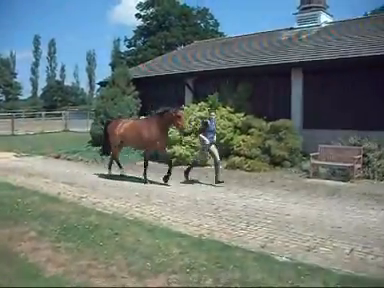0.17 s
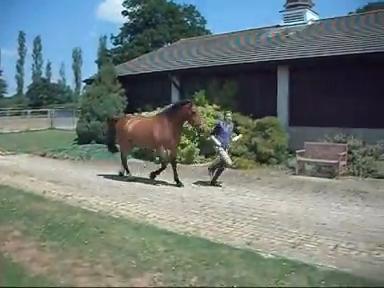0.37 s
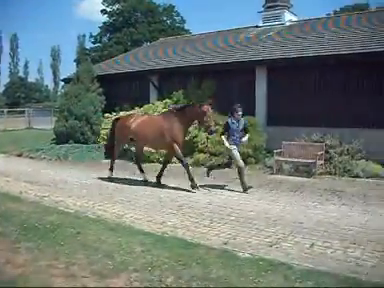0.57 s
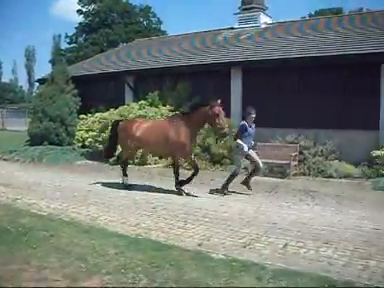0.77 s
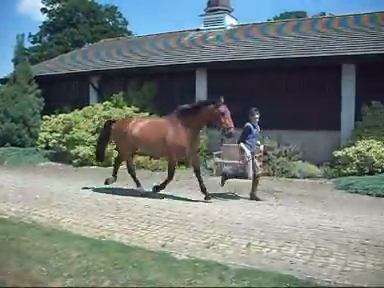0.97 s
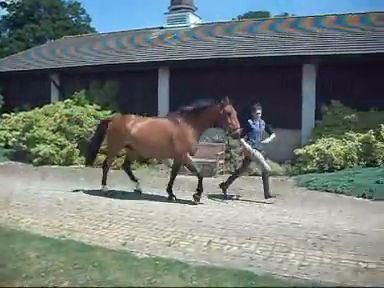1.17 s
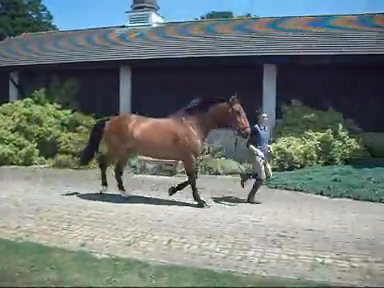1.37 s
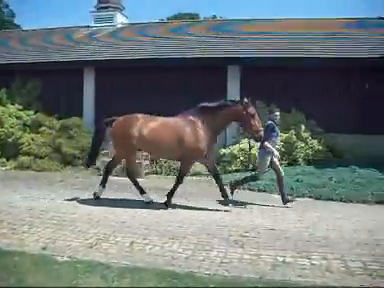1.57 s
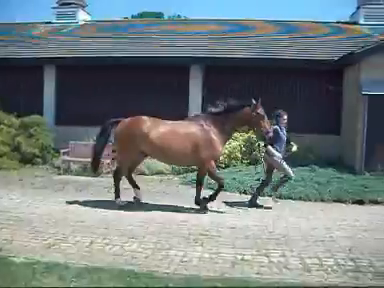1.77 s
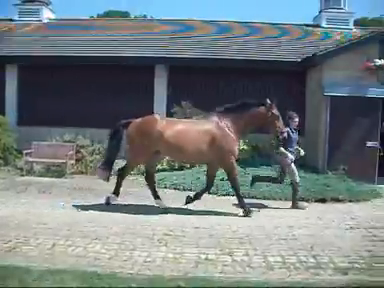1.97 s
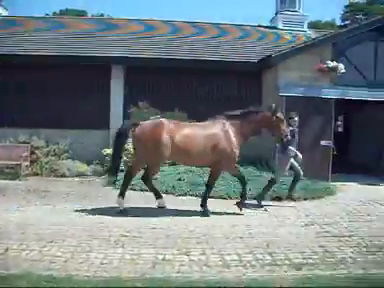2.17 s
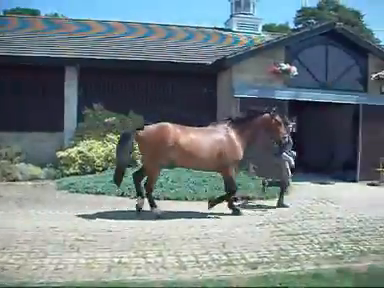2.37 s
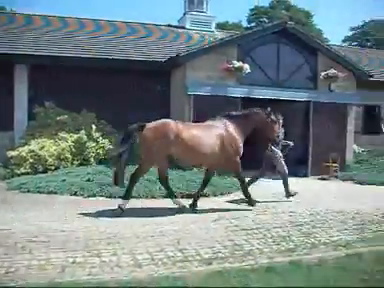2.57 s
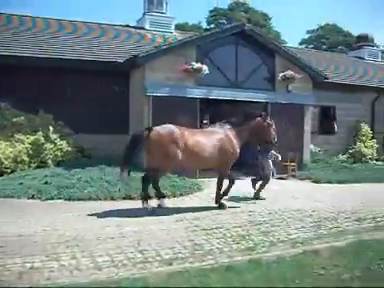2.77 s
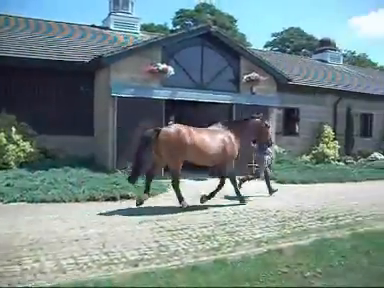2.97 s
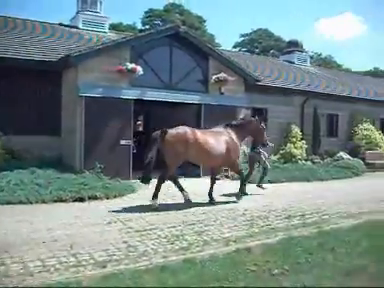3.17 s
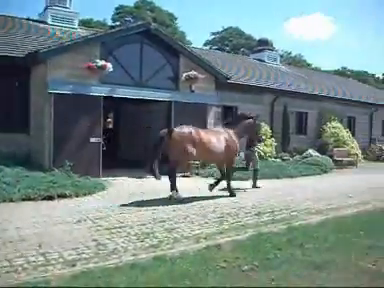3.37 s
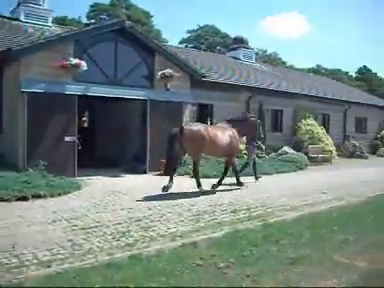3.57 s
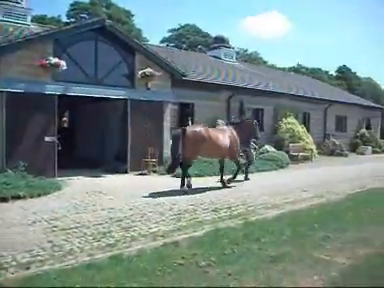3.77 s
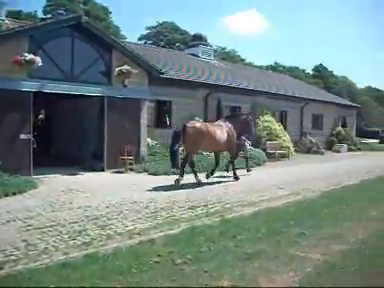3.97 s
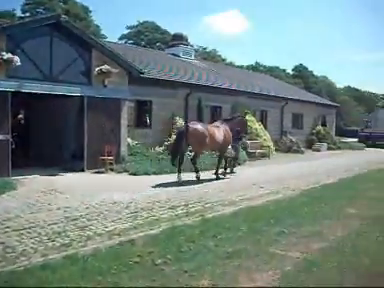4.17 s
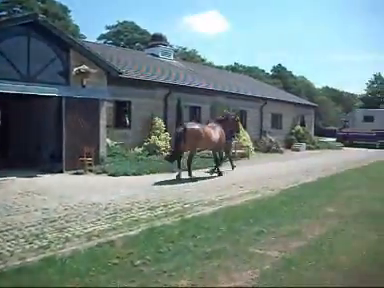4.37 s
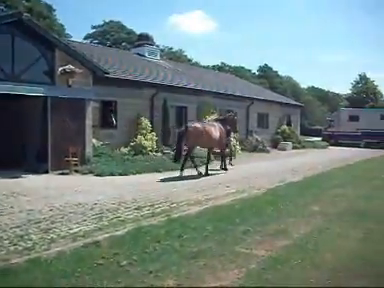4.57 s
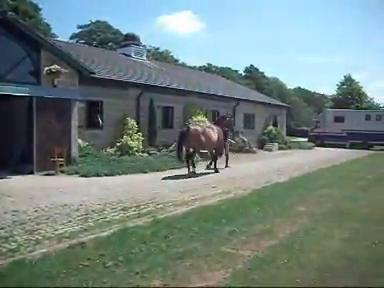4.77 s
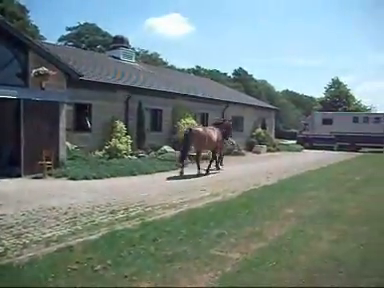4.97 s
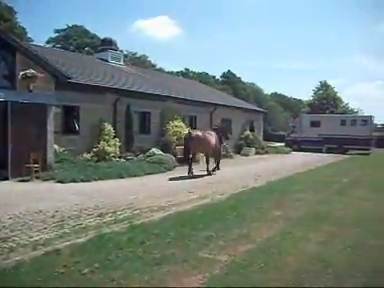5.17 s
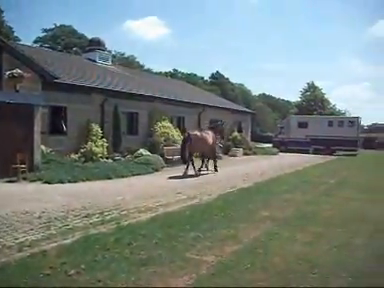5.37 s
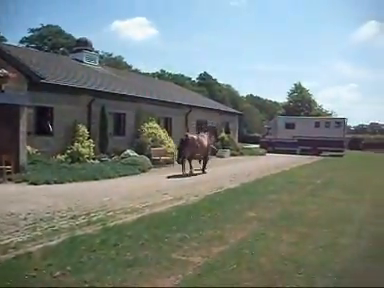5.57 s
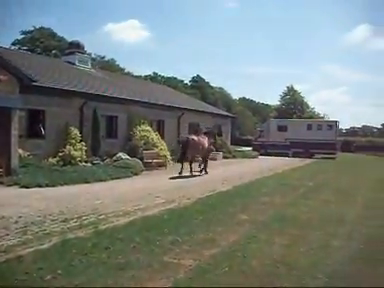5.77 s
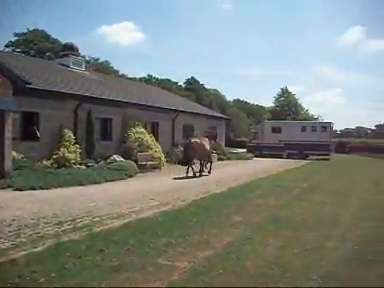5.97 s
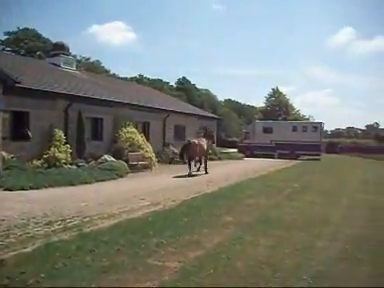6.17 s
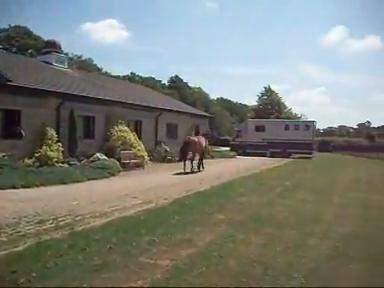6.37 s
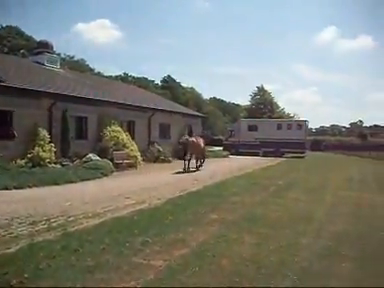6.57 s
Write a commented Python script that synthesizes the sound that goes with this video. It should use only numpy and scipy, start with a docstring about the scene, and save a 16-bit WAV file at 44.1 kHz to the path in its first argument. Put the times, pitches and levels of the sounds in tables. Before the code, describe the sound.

Even two-beat hoofbeats ring on a gritty stable yard, swelling near the middle and fading away, with early wind buffets and faint bird chips.

```python
"""A gust already rumbles on the microphone over a hush of far trees: both are noise shaped by spectra.
A shod horse trots in on stable-yard paving: hollow horn and clicking steel are decaying modes, grit is grains.
Noise reverb and a delayed slap answer from the wall; scuffs, skids and a bird's gliding whistles slip in.
Wind buffets crowd in from one to two seconds, as the handler's boots join with dull knocks.
The horse passes close near the middle, then its steps fade as it moves away."""
import sys
import numpy as np
from scipy import signal
from scipy.fft import rfft, irfft
from scipy.io import wavfile
from scipy.ndimage import uniform_filter1d

SR = 44100
rng = np.random.default_rng(int(sys.argv[2]) if len(sys.argv) > 2 else 0)


def output_pcm(signal):
    """Save a mono or channel-first signal as 16-bit PCM at the path in sys.argv[1].

    Samples are clipped to [-1, 1] before scaling.
    """
    pcm = np.clip(np.atleast_2d(signal).T, -1, 1) * 32767
    wavfile.write(sys.argv[1], SR, np.round(pcm).astype(np.int16))


N = 291060
TIME = np.arange(N) / SR
AGE = TIME[:SR // 12]   # time since a contact [s]
ATTACK = AGE < .004   # the first 4 ms of a blow

# outdoor hush: (frequency [Hz], relative level [dB])
HUSH_SPECTRUM = [(20, -13), (35, 6.5), (50, -6.5), (140, -6.5), (310, -7), (420, -12.5), (620, -10),
                 (1400, -19), (3700, -22.5), (5500, -27), (7300, -38.5), (9000, -56)]
# low wind rumble: (frequency [Hz], relative level [dB])
RUMBLE_SPECTRUM = [(20, -0.5), (36, -3), (65, -6), (100, -10), (200, -25.5), (400, -76.5)]
# wind flutter: (frequency [Hz], relative level [dB])
FLUTTER_SPECTRUM = [(40, -69), (100, 9.5), (190, 3), (320, -4), (500, -15.5), (1000, -43), (3000, -78)]
# gusts, added to the breeze: (peak time [s], swell to 1/e [s], rumble [dB], flutter [dB])
GUSTS = [(.02, 0.23, -37, -36), (.52, 0.24, -37.5, -37), (1.11, 0.069, -27.5, -33), (1.5, 0.19, -27.5, -23),
         (2.188, 0.15, -23.5, -31), (2.72, 0.17, -38.5, -41)]
BREEZE_RUMBLE_DB, BREEZE_FLUTTER_DB = -40, -66   # steady wind under the gusts
# single eddies thumping the microphone: (time [s], peak level [dB], pulse frequency [Hz])
BUFFETS = [(.038, -18, 70.4), (0.656, -19.5, 55.4), (1.084, -21, 60.5), (1.185, -8, 212), (1.268, -13, 109),
           (1.339, -3.5, 113), (1.474, -3, 240), (1.563, -12, 185), (1.638, -12, 149), (2.045, -9.5, 70),
           (2.215, -13.5, 130)]
# hoof landings before the horn and steel trims, two to a beat: (first touch [s], roll until flat [s],
# touch level [dB], flat slap level [dB], clop pitch control [Hz], steel over horn [dB],
# edge click pitch control [Hz])
LANDINGS = [(0.09, 0.012, -18, -14.5, 940, -8.5, 2580), (0.1379, 0.0034, -18, -26, 1060, 4, 2840),
            (0.4353, 0.011, -19, -17, 950, -8, 3800), (0.4771, 0.0046, -23, -10.5, 870, -2.5, 3760),
            (0.758, 0.015, -17, -15.5, 935, -3, 2970), (0.7999, .0033, -20.5, -15, 900, 2.5, 3500),
            (1.0891, 0.018, -22.5, -14, 790, 0, 3450), (1.1307, 0.0052, -13, -8, 840, -4.5, 3160),
            (1.4221, 0.012, -13, -12.5, 960, -7.5, 2980), (1.466, 0.012, -13, -16, 1160, 2, 3010),
            (1.7617, 0.0084, -19, -7, 860, -8, 2910), (1.798, 0.0092, -9.5, -13, 760, -1.5, 4080),
            (2.0826, 0.0085, -10, -8, 860, -6.5, 2640), (2.1216, 0.0098, -21.5, -11.5, 950, 0.5, 4250),
            (2.4275, 0.00362, -11, -6, 870, -14, 2950), (2.4522, .0075, -10.5, -9.5, 900, -3, 3500),
            (2.751, 0.011, -13.5, -10, 860, -3, 3020), (2.7896, 0.0053, -15.5, -11.5, 980, -0.5, 3720),
            (3.098, 0.0077, -11.5, -17, 885, -11, 2960), (3.125, 0.0095, -6.5, -14.5, 820, -3.5, 3280),
            (3.4199, 0.0092, -16.5, -3.5, 994, -1, 3260), (3.459, 0.0072, -13.5, -9.5, 785, -0.5, 3850),
            (3.7659, .0058, -19.5, -9.5, 850, -5.5, 3440), (3.7966, .004, -7.5, -27, 800, -13.5, 2460),
            (4.0966, 0.0091, -20, -14, 950, -6, 2540), (4.132, .0085, -18, -17.5, 1000, -2.5, 3900),
            (4.4538, 0.014, -22.5, -15, 870, 0, 3220), (4.4859, 0.011, -13, -24, 800, -5, 2710),
            (4.7957, 0.019, -20, -14, 980, 2, 2960), (4.8358, 0.0075, -16, -21.5, 1010, -1, 2760),
            (5.1668, 0.0084, -21, -15, 920, -9.5, 3200), (5.1857, 0.0053, -13, -15, 810, 0, 3170),
            (5.518, 0.013, -23, -18.5, 900, -3.5, 3170), (5.548, 0.0068, -31, -15, 850, 1, 4180),
            (5.8863, 0.012, -30.5, -22, 880, -3, 3480), (5.9325, 0.0045, -13, -18.5, 920, 0.5, 3840),
            (6.2514, 0.012, -21.5, -21, 930, 1, 2800), (6.2983, 0.005, -29.5, -13, 930, 1, 2830)]
# hoof capsule modes before each blow shifts them: (frequency [Hz], level [dB], decay by 60 dB [s])
HOOF_MODES = [(678, -12, 0.057), (797, -2.5, 0.024), (1013, -9.5, 0.016), (1176, -0.5, 0.0086),
              (1780, -12.5, 0.0082)]
# steel shoe damped by hoof and paving, before shifts: (frequency [Hz], level [dB], decay by 60 dB [s])
SHOE_MODES = [(2347, 4, 0.0099), (2765, 3.5, 0.0084), (3210, 12, 0.0036), (3714, -3.5, 0.0089),
              (4440, -4, 0.0014), (5070, -12, 0.024), (5670, -8.5, 0.0096), (7600, -13, 0.0048)]
# crunching grit: (frequency [Hz], relative level [dB])
GRIT_SPECTRUM = [(300, -8), (700, -2.5), (1200, -12), (1700, -2), (3000, -12.5), (4800, -14.5),
                 (5600, -19.5), (6400, -20.5), (7500, -25), (9000, -36)]
EDGE_PITCH_RATIO = 1.06   # the hoof's edge rings higher than its flat sole
FLAT_CLICK_HZ, EDGE_SHARE = 3200, .35   # flat shoe's pitch control; share of the edge's offset it keeps
CUSHION_DB_PER_S = 539   # a slow roll softens the steel of the slap
ROCK_SHARE, ROCK_LOSS_DB = .85, 12   # the hoof rocks once more, after this share of the roll
CHATTER_S, CHATTER_LOSS_DB = .024, 16   # small stray touches on the uneven paving
# slap off the stable wall: (time [s], delay [s], level [dB])
WALL_SLAP = [(0, 0.028, -7), (.8, 0.027, -12.5), (1.5, 0.037, -14), (2.8, 0.031, -18), (3.5, 0.019, -16.5),
             (4.8, 0.017, -23), (5.5, 0.024, -28), (6.3, 0.022, -19.5)]
# send to the yard's diffuse sound: (time [s], level [dB])
DIFFUSE_SEND = [(0, -20.5), (2, -23.5), (3.3, -17), (4.5, -13), (6.6, -18)]
# tone of the diffuse sound: (frequency [Hz], relative level [dB])
YARD_SPECTRUM = [(200, 7.5), (450, 3.5), (800, 2.5), (1700, 1), (3000, 0), (8000, -1.5)]
# light scuffs and kicked grit: (time [s], click level [dB])
SCUFF_TOUCHES = [(.416, -31.5), (.604, -37.5), (1.223, -36), (1.264, -32.5), (1.862, -35), (1.916, -35.5),
                 (2.4201, -29.5), (2.522, -32.5), (2.6, -36), (2.890, -37.5), (3.092, -24), (3.196, -34.5),
                 (3.258, -29.5), (3.298, -35), (3.856, -32), (3.9, -38), (4.03, -37.5), (4.059, -38),
                 (4.549, -39), (4.643, -38), (5.1617, -30), (5.355, -38), (5.447, -35), (5.79, -40),
                 (6.05, -35), (6.164, -38)]
# a shoe skids on the stone: (time [s], level [dB])
SKIDS = [(0.4817, -24.5), (1.7974, -19.5), (2.1215, -13.5), (2.128, -27), (5.547, -28)]
# high ring of the skidding shoe, before detuning: (frequency [Hz], level [dB], decay by 60 dB [s])
SKID_MODES = [(4600, 3, .012), (4830, 0, 0.0095), (6000, -8, .01), (6430, -3.5, 0.0096)]
# a far bird's chips: (time [s])
CHIPS = [.54, 0.621, 0.691, 0.917, 2.207, 2.29, 2.376, 2.606, 4.425, 4.73]
# the handler's running footfalls: (time [s], sole level [dB])
FOOTFALLS = [(1.045, -33.5), (1.273, -27), (1.944, -29.5), (2.314, -35.5), (2.64, -26.5), (2.986, -38),
             (3.989, -33.5)]


def from_db(db):
    """Decibels to gain."""
    return 10 ** (np.asarray(db) / 20)


def rms_one(x):
    """Scale to rms 1."""
    return x / np.sqrt(np.mean(x ** 2) + 1e-20)


def attack_one(x):
    """Scale a blow to rms 1 over its attack."""
    return x / np.sqrt(np.mean(x[ATTACK] ** 2) + 1e-20)


def in_time(rows):
    """Columns of a curve at every sample."""
    s, *columns = np.transpose(rows)
    return [np.interp(TIME, s, c) for c in columns]


def add(out, s, sound):
    """Mix a sound in from time s."""
    i = max(round(s * SR), 0)
    out[i:i + len(sound)] += sound[:max(N - i, 0)]


def colour(x, spectrum):
    """Give noise a spectrum; rms 1."""
    hz, db = np.transpose(spectrum)
    f = np.maximum(np.arange(len(x) // 2 + 1) * SR / len(x), 1)
    gain = from_db(np.interp(np.log(f), np.log(hz), db))
    return rms_one(irfft(rfft(x) * gain, len(x)))


def cut(x, hz, kind, order=2):
    """Butterworth high- or low-pass."""
    return signal.sosfilt(signal.butter(order, hz, kind, fs=SR, output="sos"), x)


def hush(level_db=-37.87):
    """The hush of far trees is steady noise with a broad, mostly low spectrum."""
    return from_db(level_db) * colour(rng.standard_normal(N), HUSH_SPECTRUM)


def wind(lumpy_db=3, lumps_hz=25):
    """Turbulence at the microphone port: gusts swell rumble and flutter; single eddies make pressure dips."""
    rumble, flutter = from_db(BREEZE_RUMBLE_DB), from_db(BREEZE_FLUTTER_DB)
    for s, swell_s, rumble_db, flutter_db in GUSTS:
        swell = np.exp(-((TIME - s) / swell_s) ** 2)
        rumble = rumble + from_db(rumble_db) * swell
        flutter = flutter + from_db(flutter_db) * swell
    lumps = rms_one(cut(rng.standard_normal(N), lumps_hz, "low"))
    flutter = flutter * from_db(lumpy_db * np.tanh(lumps))
    out = rumble * colour(rng.standard_normal(N), RUMBLE_SPECTRUM)
    out += flutter * colour(rng.standard_normal(N), FLUTTER_SPECTRUM)
    middle = AGE.mean()
    for s, db, hz in BUFFETS:
        u = (np.pi * hz * (AGE - middle)) ** 2
        dip = (2 * u - 1) * np.exp(-u)
        add(out, s - middle, from_db(db) * dip)
    return out


def grains(per_s, spread_db):
    """Random clicks of uneven size."""
    sizes = from_db(spread_db * np.minimum(rng.exponential(1, N), 4))
    return (rng.random(N) < per_s / SR) * sizes * rng.choice([-1, 1], N)


def strike(modes, pitch_hz, stretch, tilt_db, scatter_db, detune, rise_s):
    """One blow on a set of modes; where it lands shifts them and favours the high or low ones."""
    hz, db, t60 = np.transpose(modes)
    centre = np.average(hz, weights=from_db(db) ** 2 * t60)
    shift = np.log2(pitch_hz / centre)   # octaves
    tilt = tilt_db * shift * np.log2(hz / centre)
    gain = from_db(db + tilt + scatter_db * rng.standard_normal(len(hz)))
    # the modes follow only a share of the pitch shift
    hz = hz * 2 ** (stretch * shift + detune * rng.standard_normal(len(hz)))
    rings = np.sin(2 * np.pi * hz[:, None] * (AGE - rise_s)) * from_db(-60 * AGE / t60[:, None])
    return attack_one(gain @ rings * np.minimum(AGE / rise_s, 1))


def roughen(ring, rasp_db, rasp_t60):
    """Grains crush under the foot, so a spray of tiny touches follows the first."""
    spray = rng.standard_normal(len(AGE)) * from_db(-60 * AGE / rasp_t60)
    rasp = attack_one(signal.fftconvolve(ring, spray)[:len(AGE)])
    return attack_one(ring + from_db(rasp_db) * rasp)


def clop(pitch_hz, thud_hz=260, thud_t60=0.018, thud_db=-10):
    """The hollow horn rings over a short thud of the horse's weight."""
    horn = strike(HOOF_MODES, pitch_hz, stretch=0.34, tilt_db=29.0, scatter_db=2.5, detune=0.072,
                  rise_s=0.00089)
    thud = np.sin(2 * np.pi * thud_hz * AGE) * from_db(thud_db - 60 * AGE / thud_t60)
    return roughen(horn, rasp_db=-2.5, rasp_t60=0.022) - thud


def click(pitch_hz):
    """Steel meets stone: short bright modes, roughened by grit and thinned of their lows."""
    steel = strike(SHOE_MODES, pitch_hz, stretch=0.046, tilt_db=21, scatter_db=2.5, detune=0.044,
                   rise_s=0.000399)
    rough = roughen(steel, rasp_db=-4.5, rasp_t60=0.012)
    return attack_one(cut(rough, 1490, "high", order=3))


def contacts(count=4):
    """Each hoof touches with an edge, slaps flat, rocks and chatters on the paving."""
    rows = []   # (time [s], horn [dB], clop pitch [Hz], steel over horn [dB], click pitch [Hz])
    for s, roll_s, touch_db, slap_db, hz, steel_db, edge_hz in LANDINGS:
        flat_steel_db = steel_db - CUSHION_DB_PER_S * roll_s
        flat_hz = FLAT_CLICK_HZ + EDGE_SHARE * (edge_hz - FLAT_CLICK_HZ)
        rock_s, rock_db = s + roll_s * (1 + ROCK_SHARE), slap_db - ROCK_LOSS_DB
        chatter_db = max(touch_db, slap_db) - CHATTER_LOSS_DB
        rows.append((s, touch_db, hz * EDGE_PITCH_RATIO, steel_db, edge_hz))
        rows.append((s + roll_s, slap_db, hz, flat_steel_db, flat_hz))
        rows.append((rock_s, rock_db, hz / EDGE_PITCH_RATIO, flat_steel_db, flat_hz))
        for late_s in CHATTER_S * rng.random(count):
            rows.append((s + late_s, chatter_db, hz, flat_steel_db, edge_hz))
    return rows


def hooves(horn_trim_db=-1.0, steel_trim_db=-0.8, grit_db=-4.5, grit_t60=0.056, slide_s=0.0044):
    """Every contact rings hoof and shoe; the foot grinds grit as it slides in and settles."""
    out, pressure = np.zeros(N), np.zeros(N)
    for s, db, clop_hz, steel_db, click_hz in contacts():
        horn = from_db(db + horn_trim_db)
        steel = from_db(db + steel_db + steel_trim_db)
        add(out, s, horn * clop(clop_hz) + steel * click(click_hz))
        add(pressure, s, (horn * steel) * from_db(-60 * AGE / grit_t60) ** 2)
    # pressure is summed as power, smoothed over the slide, then turned back to amplitude
    grinding = np.sqrt(np.abs(uniform_filter1d(pressure, max(int(slide_s * SR), 1))))
    return out + from_db(grit_db) * grinding * colour(grains(2200, 6.7), GRIT_SPECTRUM)


def yard(x, early_t60=0.19, late_t60=1.0, late_db=-17, wall_low_hz=900, build_s=0.0027,
         eaves_db=-4, eaves_t60=.06):
    """A slap off the stable wall, smeared by doors and eaves; scatter from the bushes, and a faint long tail."""
    delay, wall_db = in_time(WALL_SLAP)
    smear = rng.standard_normal(len(AGE)) * from_db(-60 * AGE / eaves_t60)
    smeared = signal.fftconvolve(x, smear / np.linalg.norm(smear))[:N]
    bounced = cut(x + from_db(eaves_db) * smeared, wall_low_hz, "high", order=1)
    slap = from_db(wall_db) * np.interp(TIME - delay, TIME, bounced)
    t = TIME[:SR]
    early, late = from_db(-60 * t / early_t60), from_db(late_db - 60 * t / late_t60)
    decay = (early + late) * np.minimum(t / build_s, 1)
    response = colour(rng.standard_normal(SR), YARD_SPECTRUM) * decay
    send = x * from_db(in_time(DIFFUSE_SEND)[0])
    diffuse = signal.fftconvolve(send, response / np.linalg.norm(response))[:N]
    return slap + diffuse


def scuffs(pitch_hz=3500, knock_hz=1000, knock_db=-2, loose_db=-45, loose_t60=1.16, grain_cut_hz=6500):
    """Light touches ring shoe and hoof, and loose grains skitter away after each landing."""
    out, stirred = np.zeros(N), np.zeros(N)
    for s, db in SCUFF_TOUCHES:
        add(out, s, from_db(db) * (click(pitch_hz) + from_db(knock_db) * clop(knock_hz)))
    settling = from_db(-60 * TIME[:SR // 2] / loose_t60)   # stops after half a second
    for s, _, touch_db, slap_db, *_ in LANDINGS:
        add(stirred, s, (from_db(max(touch_db, slap_db)) * settling) ** 2)
    loose = cut(colour(grains(110, 7), GRIT_SPECTRUM), grain_cut_hz, "low")
    return out + from_db(loose_db) * rms_one(np.sqrt(stirred)) * loose


def skids(pitch_hz=5400, rasp_db=0, rasp_t60=0.016):
    """Steel slides a little and rings high, with a rasp as strong as the ring."""
    out = np.zeros(N)
    for s, db in SKIDS:
        ring = strike(SKID_MODES, pitch_hz, stretch=0, tilt_db=5, scatter_db=4.5, detune=.01,
                      rise_s=0.00047)
        add(out, s, from_db(db) * roughen(ring, rasp_db, rasp_t60))
    return out


def bird(top_hz=4100, fall_hz=450, crest=0.28, chip_s=0.036, chip_db=-46,
         upper_hz=6900, upper_rise_hz=250, upper_db=-11):
    """Short thin whistles that arch and fall, with a fainter second note rising above."""
    out, u = np.zeros(N), np.minimum(AGE / chip_s, 1)   # u: progress through a chip
    lower = top_hz - fall_hz * ((u - crest) / (1 - crest)) ** 2
    upper = upper_hz + upper_rise_hz * u
    for s, shift in zip(CHIPS, rng.normal(1, 0.015, len(CHIPS))):
        for hz, db in ((lower, chip_db), (upper, chip_db + upper_db)):
            whistle = np.sin(2 * np.pi * np.cumsum(shift * hz) / SR)
            add(out, s, from_db(db) * np.sin(np.pi * u) * whistle)
    return out


def handler(sole_t60=0.073, sole_cut_hz=1100, knock_hz=800, knock_db=-4):
    """Boot soles knock dully and press the grit."""
    out, pressure = np.zeros(N), np.zeros(N)
    for s, db in FOOTFALLS:
        add(out, s, from_db(db + knock_db) * clop(knock_hz))
        add(pressure, s, from_db(db - 60 * AGE / sole_t60))
    crunch = rms_one(cut(colour(rng.standard_normal(N), GRIT_SPECTRUM), sole_cut_hz, "low"))
    return out + pressure * crunch


def scene():
    """Horse and handler in the yard, with wind, a bird and the hush of far trees."""
    steps = hooves() + scuffs() + skids() + handler()
    return (hush() + wind() + steps + yard(steps) + bird())[None]


def record(dry, notch_hz=5550, notch_q=8, notch_db=-15, ceiling_db=0.0, top_hz=8600):
    """A small microphone with a treble notch; the hardest peaks overload and the top is cut."""
    notched = signal.lfilter(*signal.iirnotch(notch_hz, notch_q, SR), dry)
    coloured = notched + from_db(notch_db) * (dry - notched)
    rounded = coloured / (1 + (coloured / from_db(ceiling_db)) ** 6) ** (1 / 6)
    return signal.sosfilt(signal.ellip(8, .3, 70, top_hz, fs=SR, output="sos"), rounded)


dry = scene()
out = record(dry)
output_pcm(out)
```